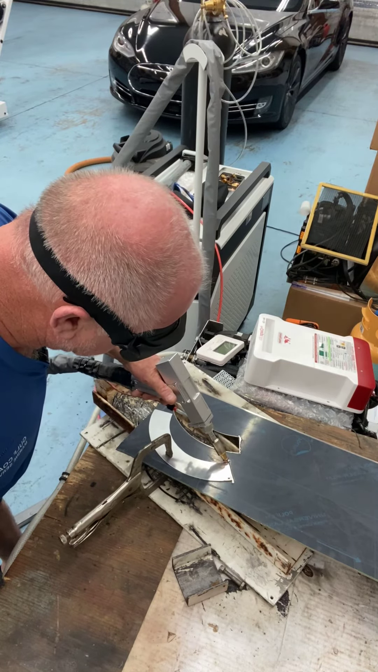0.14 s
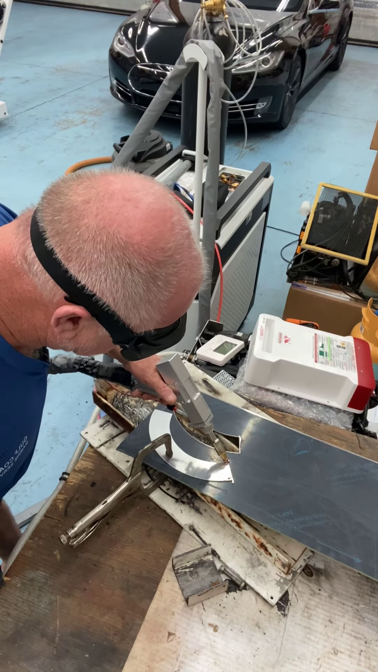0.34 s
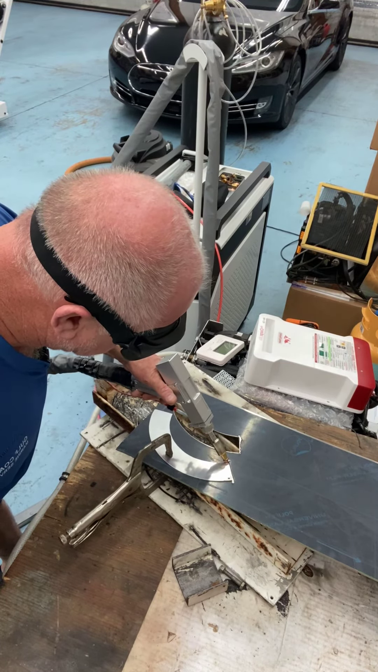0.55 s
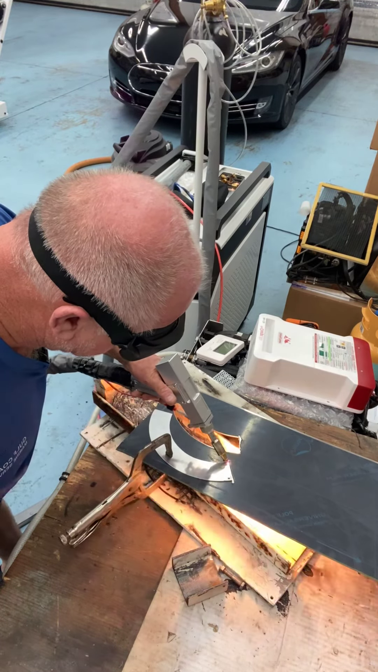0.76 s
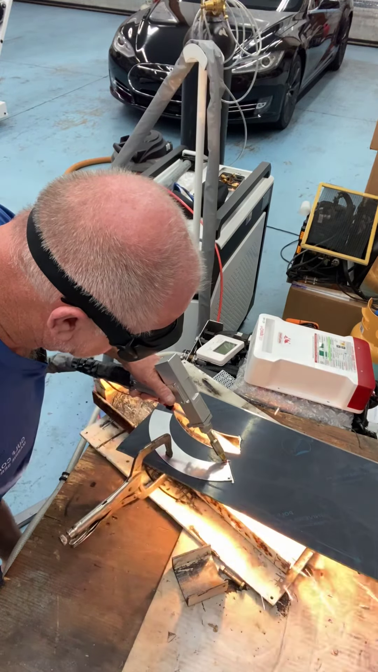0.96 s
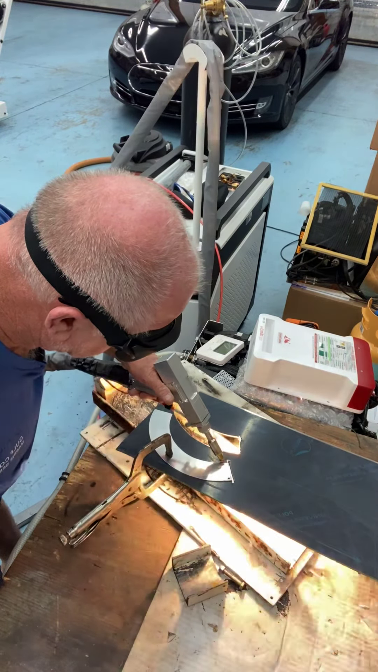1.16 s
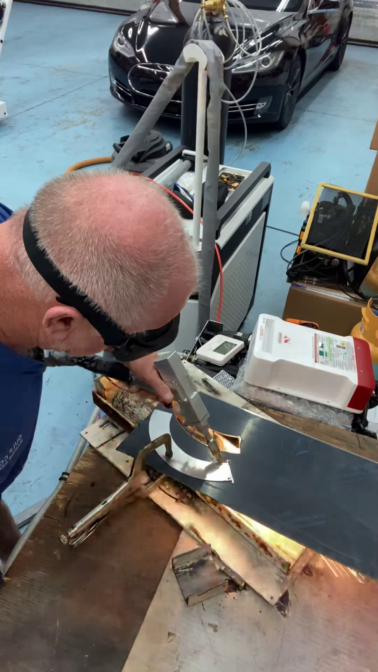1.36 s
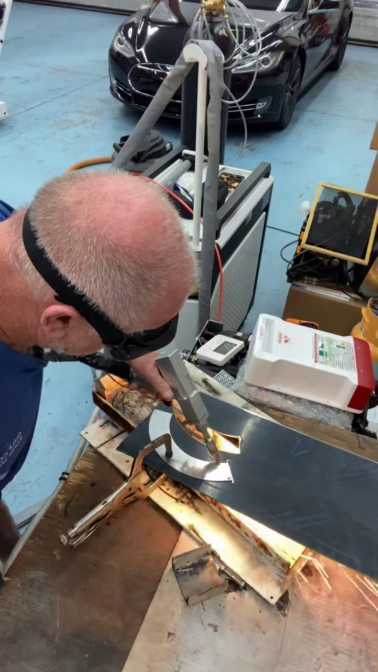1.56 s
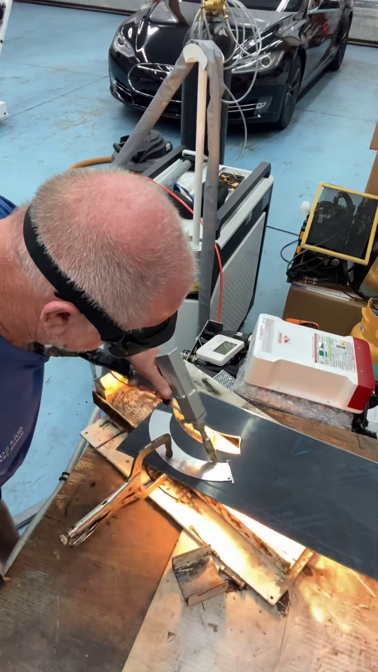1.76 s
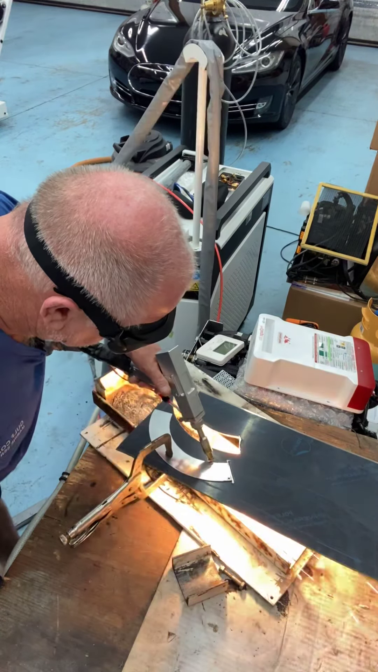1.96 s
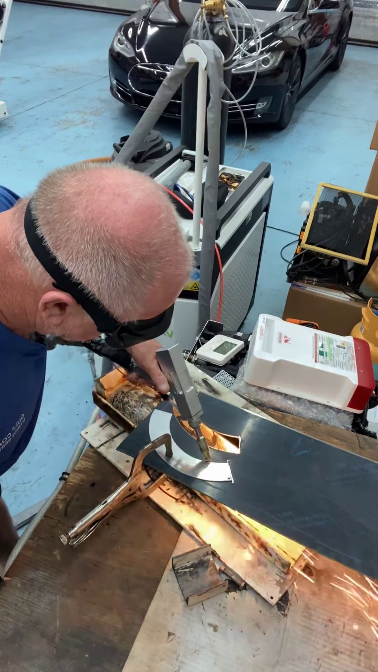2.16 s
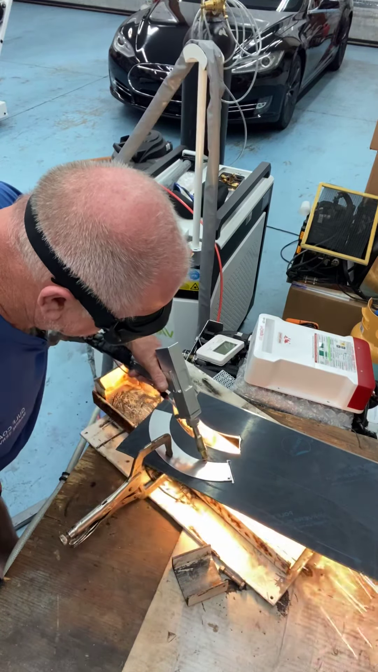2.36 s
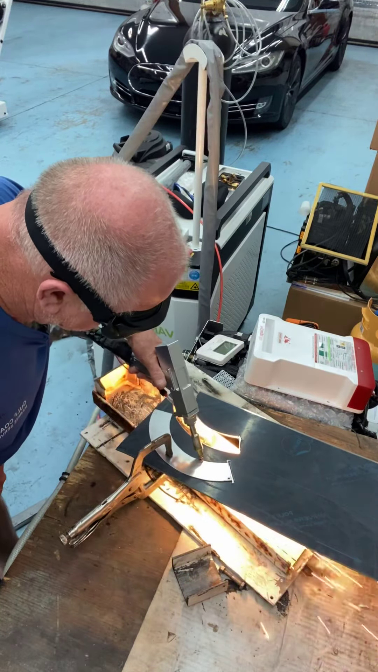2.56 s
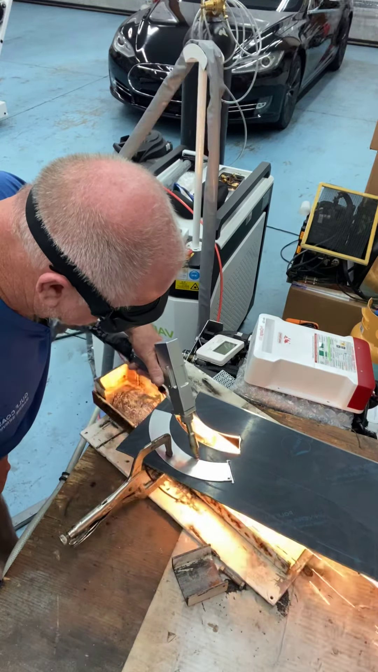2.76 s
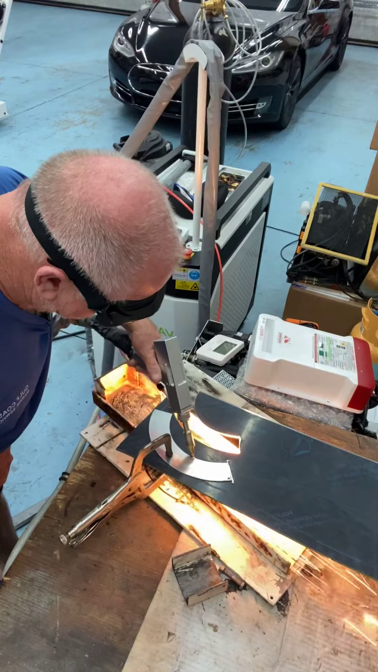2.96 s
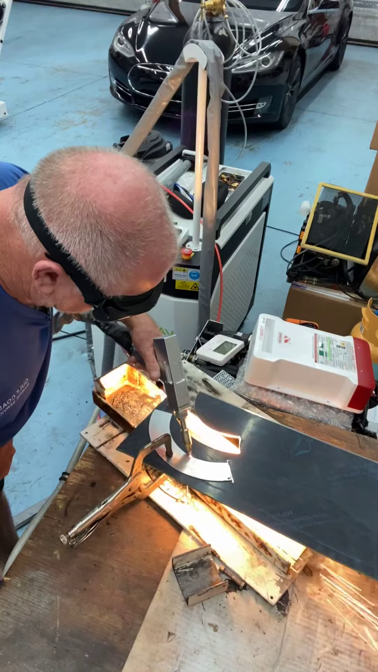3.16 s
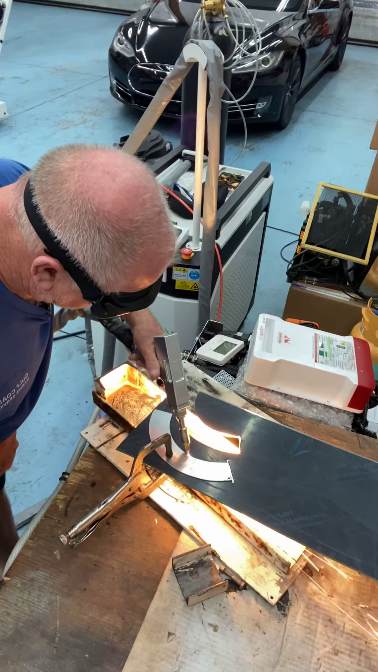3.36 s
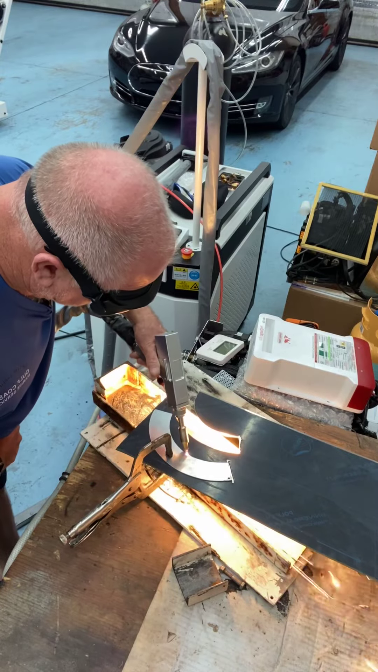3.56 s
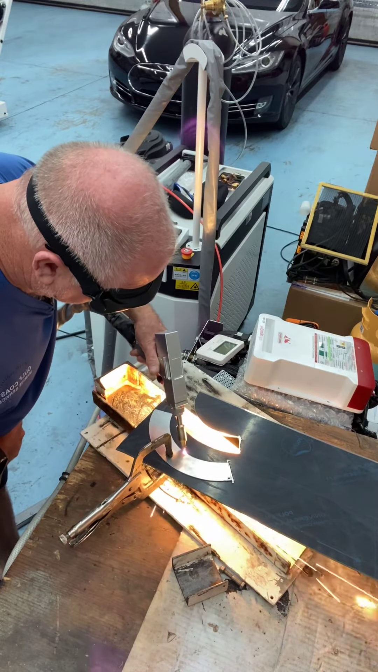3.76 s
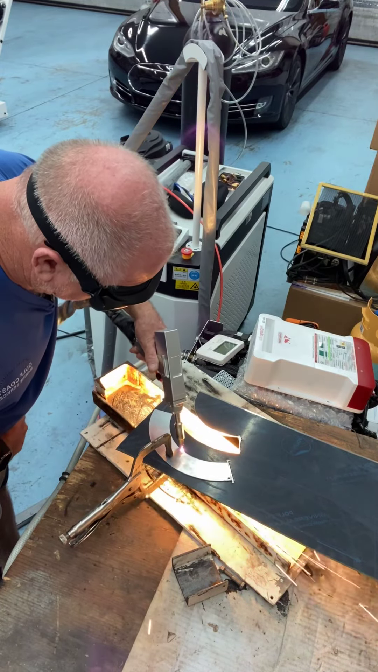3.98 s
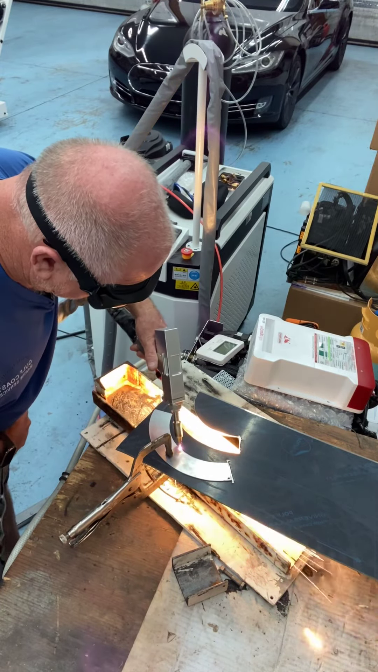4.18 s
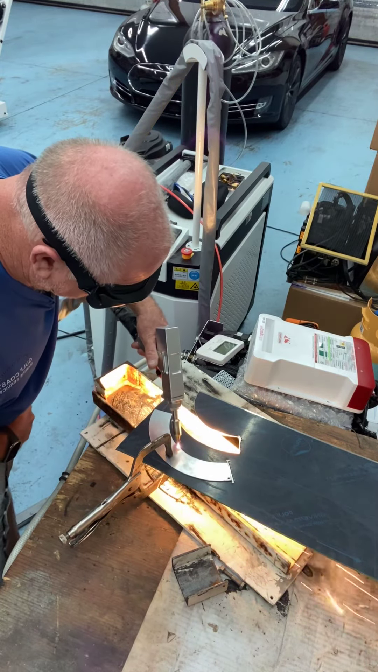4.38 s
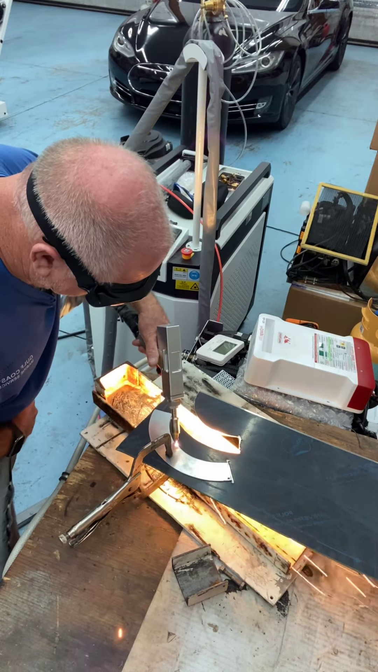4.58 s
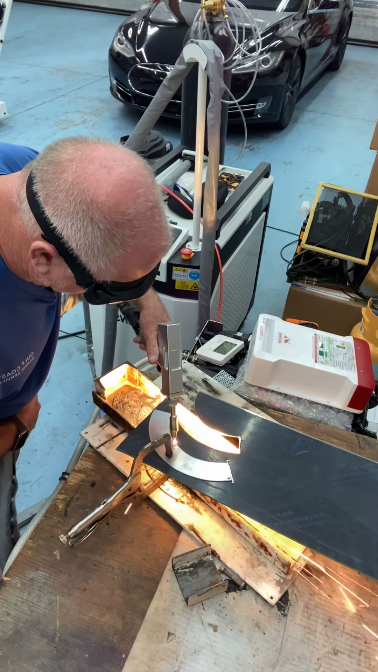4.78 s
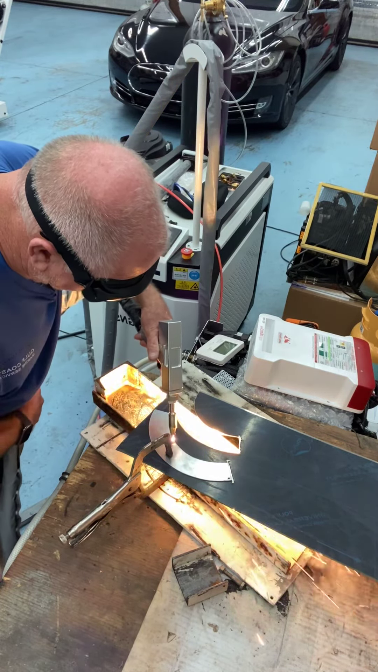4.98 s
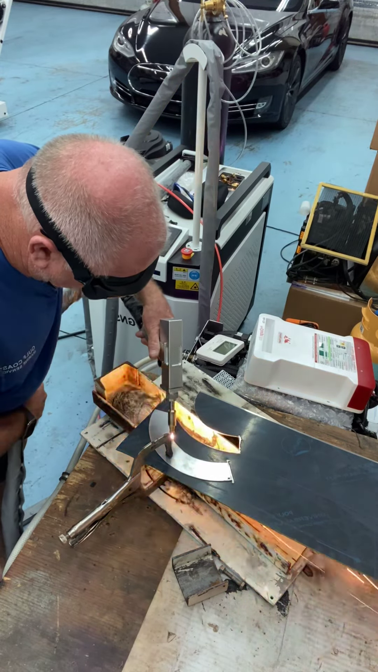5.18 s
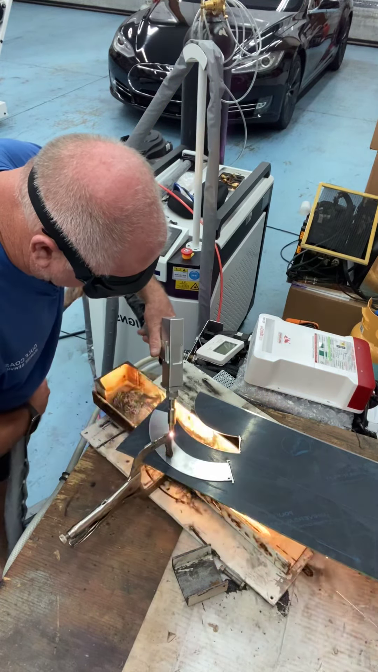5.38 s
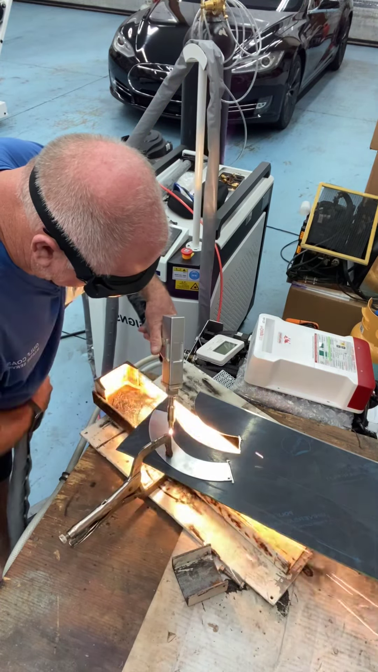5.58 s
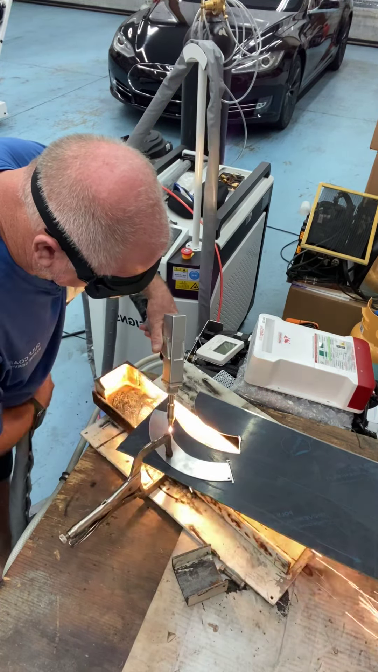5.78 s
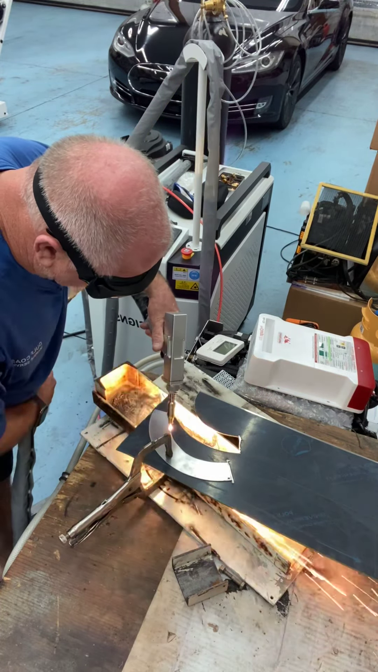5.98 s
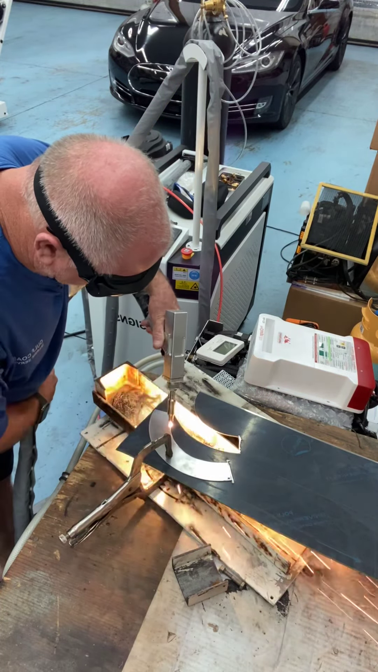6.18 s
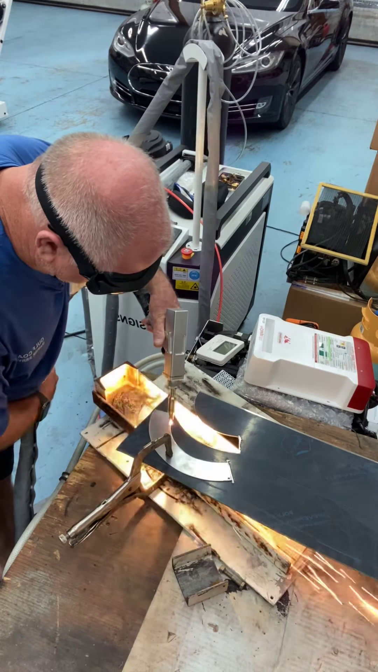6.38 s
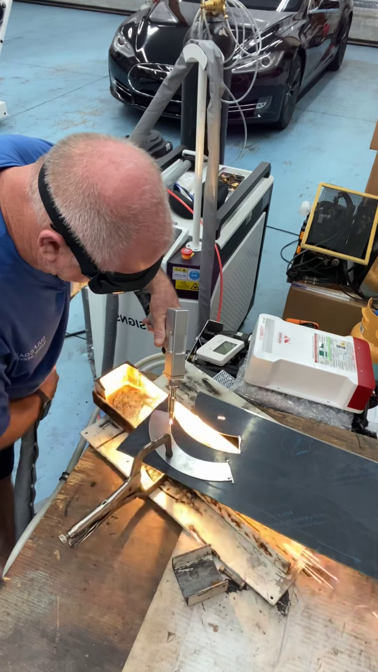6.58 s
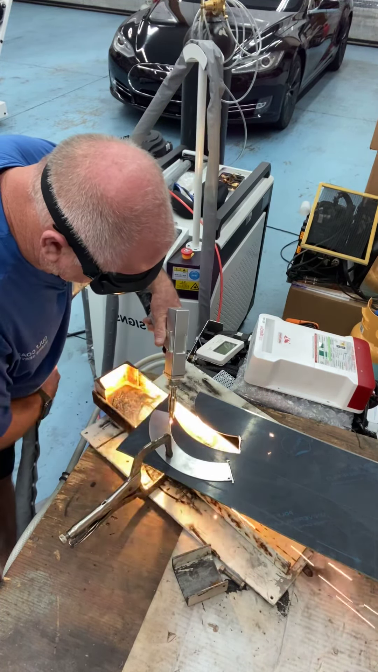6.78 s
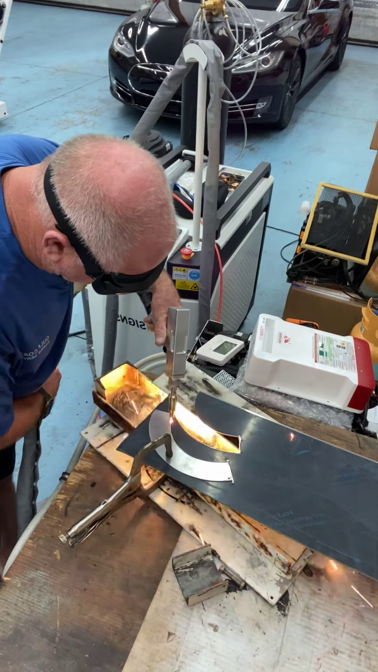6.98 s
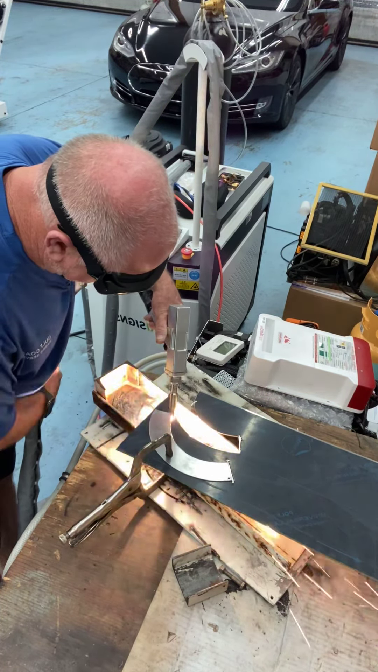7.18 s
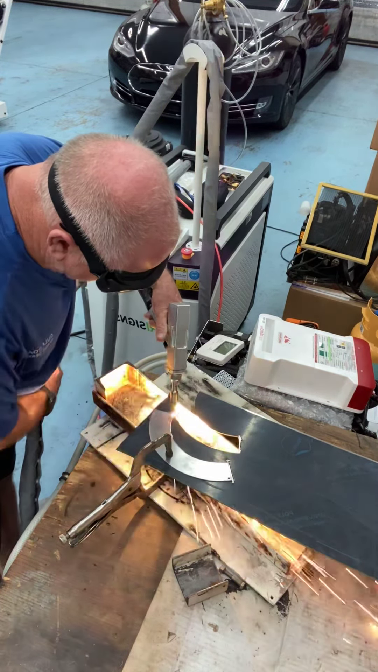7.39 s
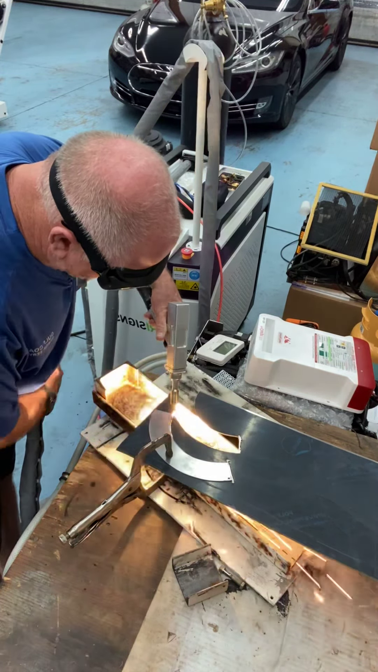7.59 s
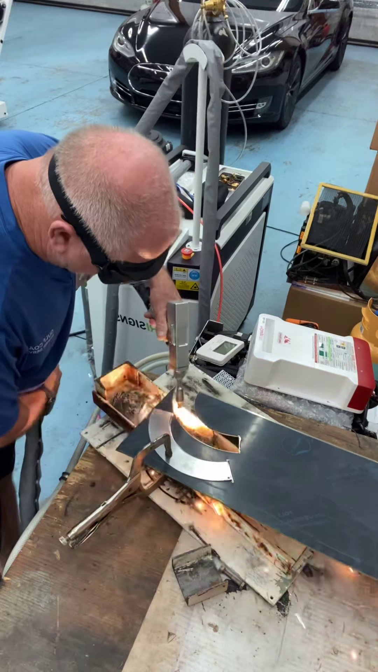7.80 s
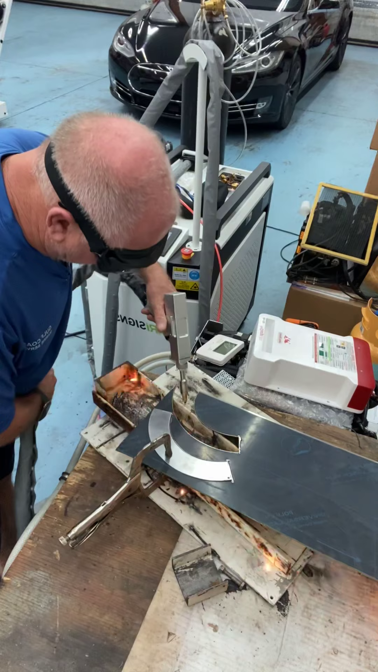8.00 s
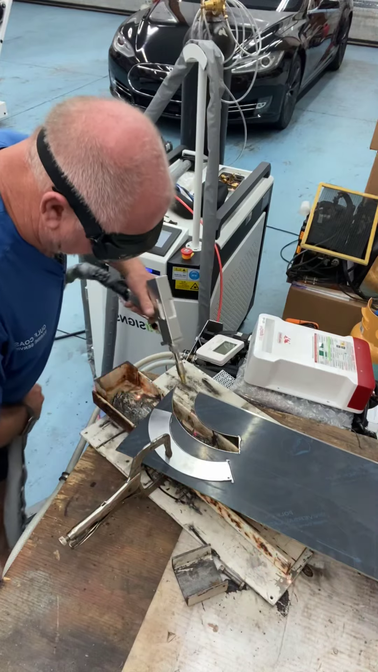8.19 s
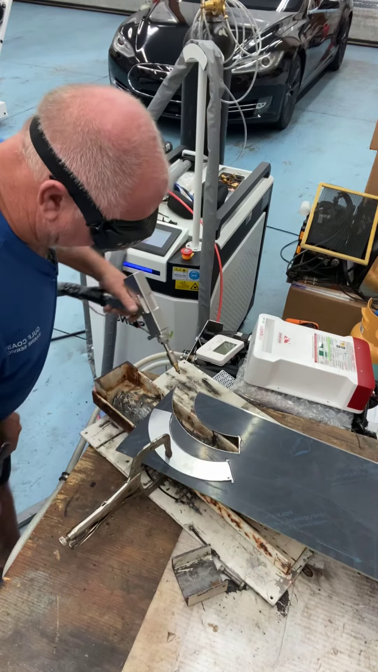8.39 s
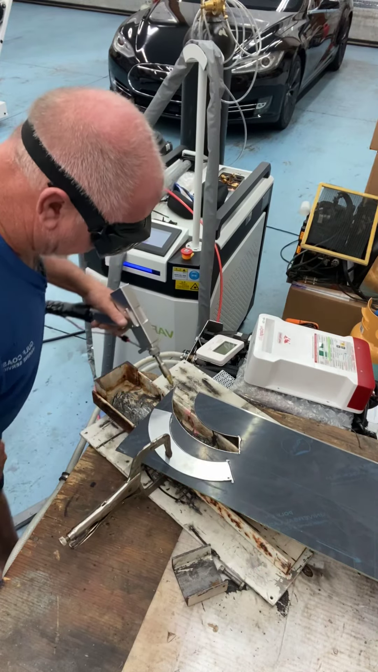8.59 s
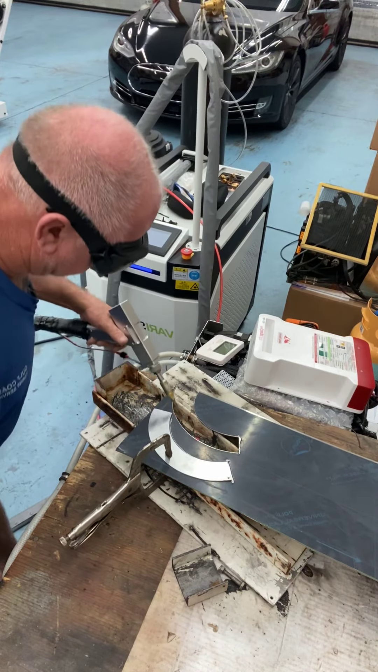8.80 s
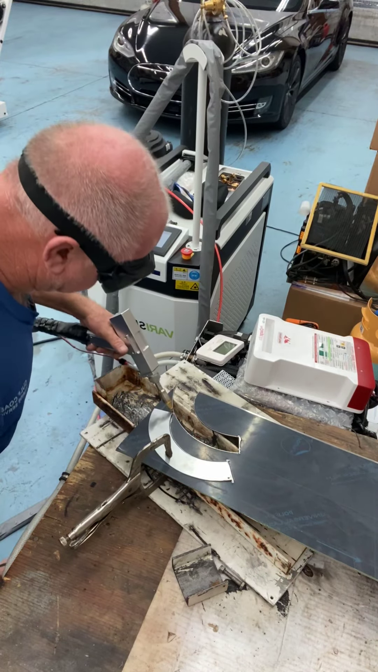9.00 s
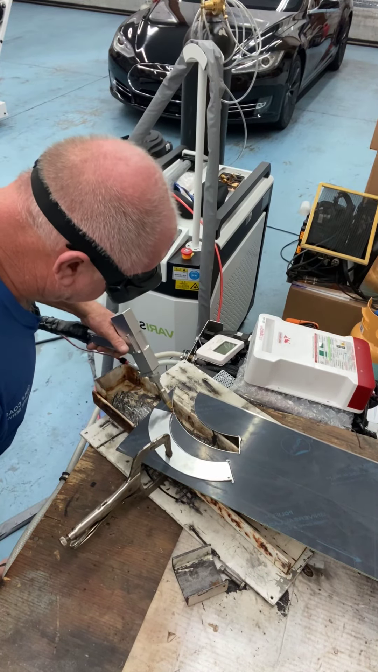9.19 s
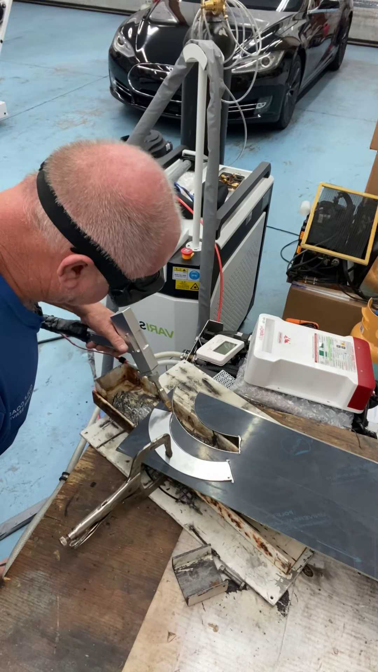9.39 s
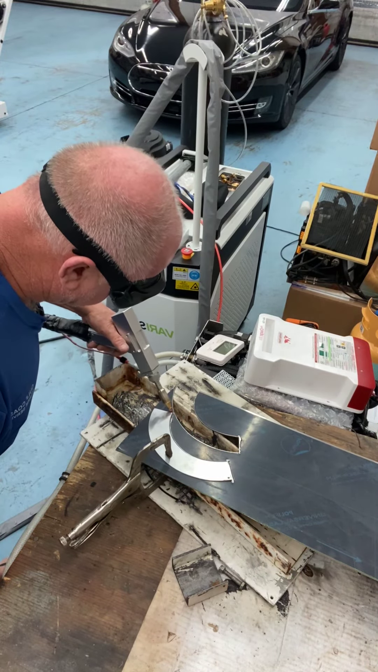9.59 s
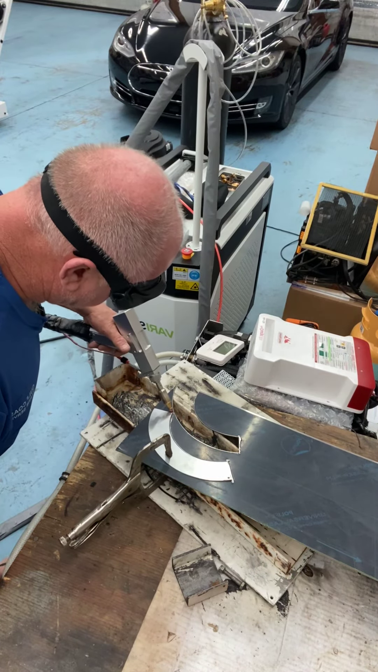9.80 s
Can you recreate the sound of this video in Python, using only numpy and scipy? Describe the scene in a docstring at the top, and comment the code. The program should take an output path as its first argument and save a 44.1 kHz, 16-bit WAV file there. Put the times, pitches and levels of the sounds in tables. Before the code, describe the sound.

A valve clicks, a harsh gas jet tears and sputters through metal, late squeals and pops, a final whoosh, then quiet workshop machine noise.

```python
"""Handheld laser cutter in a workshop

A valve clicks with a few decaying sines; jet noise hisses, rushes and sputters as gas tears through steel.
Gliding tones with overtones and noisy skirts squeal on the cut's edges; noise bursts spit, mostly late.
The torch lifts in a whoosh and the gas dies away. Filtered noise and faint sines make the machine, which
runs throughout; the hall adds a noise tail. Mono."""
import sys
import numpy as np
from scipy import signal
from scipy.fft import irfft
from scipy.io import wavfile
from scipy.ndimage import uniform_filter1d

SR = 44100
rng = np.random.default_rng(int(sys.argv[2]) if len(sys.argv) > 2 else 0)


def generate_wav(sig):
    """Save sig (samples, or channels by samples) to the path in sys.argv[1] as 16-bit PCM at SR."""
    pcm = np.round(np.clip(np.atleast_2d(sig).T, -1, 1) * 32767).astype(np.int16)
    wavfile.write(sys.argv[1], SR, pcm)


N = 434385
TIME = np.arange(N) / SR

# How the torch is held. Each row: time in seconds, pose number
# (0 slanted, 1 piercing, 2 upright, 3 at the sheet's edge, 4 lifted off).
TORCH_POSE = [(0, 0), (2.6, 0), (3.3, 1), (4.6, 1), (5.2, 2), (5.9, 2), (7.2, 3), (8.06, 3), (8.25, 4),
              (9.85, 4)]


def nozzle():
    """The jet hisses as broadband flow noise with a fine crackle of sparks; echoes off the sheet comb it."""
    # Each row: time in seconds, hiss level in dB.
    hiss_level = [(.94, -34), (1.2, -26), (1.5, -29.5), (1.8, -28.7), (2.25, -33.5), (3.0, -32), (3.3, -35),
                  (3.7, -33), (4.95, -33), (5.8, -33), (6.66, -31.5), (6.8, -26), (7.03, -28), (7.18, -30),
                  (7.35, -28), (8.06, -28.5), (8.16, -26.5)]
    # Each row: time in seconds, level of the hiss above 10 kHz in dB (0 leaves it as it is).
    treble_level = [(1.4, -2.5), (2.1, 2.5), (2.8, 4), (3.35, -1.5), (4.8, 1), (6.3, -0.5), (6.9, -2.5),
                    (7.3, 7.5), (7.55, 1.5), (8.1, 4.5)]
    hiss_db, = curves(hiss_level)
    treble_db, = curves(treble_level)
    pressure_db, gas_on = pressure()
    hiss = jet_colour(turbulence(rate_hz=1000, scatter_db=5.5, grain_db=-10.5))
    treble_taps = signal.firwin(41, 10000, pass_zero=False, fs=SR)
    treble = signal.oaconvolve(hiss, treble_taps, mode="same")
    hiss = hiss + (undb(treble_db) - 1) * treble
    hiss = mirror(hiss, lag_ms=.33, sway=.14, share=.15)
    hiss = mirror(hiss, lag_ms=1.1, sway=.1, share=.2)
    return hiss * undb(hiss_db + pressure_db + 0.5 * walk(50)) * gas_on


def jet_colour(x):
    """White x takes the colour of the jet, which depends on the torch's pose."""
    # Each row of the five: frequency in Hz, relative level in dB.
    slanted = [(1410, -38), (2400, -15.5), (2940, -12.5), (3280, -5), (3810, -2), (4190, -5.5),
               (5010, -1.5), (5600, -8), (6700, -5.5), (7960, 1.5), (9610, -4.5), (11400, -4), (12500, -9),
               (13600, -7.5), (15600, -13)]
    piercing = [(1530, -41), (2600, -17), (3020, -9), (3670, 0), (4670, 0.5), (5070, 1.5), (6950, -3.5),
                (7900, 4), (8640, -0.5), (9310, -2.5), (10600, -2), (13600, -5), (15600, -7)]
    upright = [(2700, -9.5), (3100, -12), (3800, -4.5), (4900, -1), (6200, 1), (7000, -2), (9200, 1),
               (10500, -3), (12100, -2), (13000, -8), (15100, -3.5), (15600, -10)]
    edge = [(1530, -43), (2600, -12), (3020, -13), (4170, -7), (4850, -0.5), (5470, 1), (6590, -0.5),
            (7160, -7), (7780, -3), (9310, 0.5), (10900, -11), (11800, -8.5), (13700, -13), (14800, -12.5),
            (15600, -7.5)]
    lifted = [(2600, -15), (3000, -10.5), (4000, -11), (5300, -9), (6700, -16), (9300, -18.5), (15600, -31)]
    return posed(x, [slanted, piercing, upright, edge, lifted], band_hz=(3500, 15500))


def mirror(x, lag_ms, sway, share):
    """An echo off the sheet; its path sways with the hand and sweeps a comb through the hiss."""
    lag = lag_ms * SR / 1000 * np.exp(sway * walk(1.3))
    samples = np.arange(N)
    echo = np.interp(samples - lag, samples, x)
    return (x + share * echo) / np.sqrt(1 + share ** 2)


def cut():
    """Gas tears through the molten slot: one stream of eddies makes rush, duller clog roar and low sputter."""
    # Free cut, one row per pose. Each row: rush level in dB, sputter level in dB.
    free_cut = [(-39, -58.5), (-38.5, -69), (-34.5, -55), (-36, -54), (-27.5, -68)]
    # Rush spectra by pose. Each row of the five: frequency in Hz, relative level in dB.
    slanted = [(280, -37), (480, -15), (560, -3), (672, -7.5), (834, -4.5), (948, 2), (1130, 1),
               (1910, -6.5), (2400, -21.5), (3120, -51), (5280, -120)]
    piercing = [(450, -8.5), (760, -7), (935, -7), (1110, 0), (1300, -4), (1590, -10.5), (1980, -13),
                (2390, -27.5), (2700, -30), (3510, -59), (5940, -120)]
    upright = [(420, -19), (560, -17.5), (830, -2.5), (1000, -2), (1180, 3.5), (1400, -2), (1750, -3),
               (2080, -6), (2350, -14.5), (2700, -25)]
    edge = [(280, -43.5), (480, -26.5), (684, -12.5), (730, -13), (856, 2.5), (1050, -2.5), (1130, 4.5),
            (1660, -4.5), (2140, -1.5), (2550, -10.5), (2700, -17.5), (3510, -48.5), (5940, -120)]
    lifted = [(400, -7.5), (730, -3), (880, 4.5), (1100, 5.5), (1420, -1.5), (1750, -6), (2050, -3.5),
              (2350, -9.5), (2700, -18)]
    # Sputter of the melt. Each row: frequency in Hz, relative level in dB.
    sputter_spectrum = [(25, -53.5), (60, -31.5), (120, -12.5), (200, -6), (300, -4), (430, 0), (550, -0.5),
                        (670, 0.5), (780, -7.5), (1500, -30)]
    flow_db_per_pressure_db = 0.68
    # the rush is weaker until the beam has pierced the sheet
    unpierced_db, pierced_s, piercing_s = -7.5, 1.09, 0.1
    lift_sputter_db = -39  # against the whoosh

    pose, = curves(TORCH_POSE)
    pressure_db, gas_on = pressure()
    rush_db, sputter_db = (np.interp(pose, np.arange(len(db)), db) for db in np.transpose(free_cut))
    free_rush = undb(rush_db + flow_db_per_pressure_db * pressure_db)
    free_sputter = undb(sputter_db + flow_db_per_pressure_db * pressure_db)
    clog_rush_power, clog_sputter_power = clogs()
    whoosh = lift()

    eddies = turbulence(rate_hz=480, scatter_db=2.5, grain_db=-1.5)
    unit_eddies = eddies / eddies.std()
    rush = posed(eddies, [slanted, piercing, upright, edge, lifted], band_hz=(850, 2300))
    roar = colour(unit_eddies, piercing, band_hz=(850, 2300))
    sputter = colour(unit_eddies, sputter_spectrum, band_hz=(80, 350))

    unpierced = np.clip((pierced_s - TIME) / piercing_s, 0, 1)
    free = np.hypot(free_rush * undb(unpierced_db * unpierced), whoosh)
    roar_gain = np.sqrt(free ** 2 + clog_rush_power) - free
    rush = (rush * free + roar * roar_gain) * undb(0.84 * walk(18))
    whoosh_sputter = whoosh * undb(lift_sputter_db)
    sputter_gain = np.sqrt(free_sputter ** 2 + clog_sputter_power + whoosh_sputter ** 2)
    sputter = sputter * sputter_gain * undb(0.72 * walk(16))
    return (rush + sputter) * undb(1.3 * walk(60)) * gas_on


def clogs():
    """Melt clogs the slot and gas blows back: rush and sputter power; rush gains on sputter as the slot heats."""
    # Each row: start in seconds, length in seconds, attack in seconds, sputter level in dB.
    clog_rows = [(0.781, .03, 0.0056, -54.5), (0.886, .165, 0.0089, -45.5), (1.837, 0.19, 0.04, -54),
                 (2.4, 0.15, .05, -54), (2.836, 0.29, 0.14, -46.5), (3.039, 1.92, 0.01, -38),
                 (4.98, 0.03, 0.022, -45), (5.13, .04, .02, -48.5), (5.598, .39, .02, -49),
                 (6.343, 0.012, 0.019, -43), (6.51, 0.014, .015, -46), (6.694, 0.14, .04, -50),
                 (7.21, 0.1, .06, -51), (7.637, .14, 0.054, -55), (7.704, .02, .005, -46.5)]
    release_s, sag_db_per_s = 0.047, 2
    rush_db, heat_db, heat_s = 2, 11, 0.41  # rush above sputter at the start, its growth, time constant
    rush, sputter = np.zeros(N), np.zeros(N)
    for s, length_s, attack_s, db in clog_rows:
        at = np.flatnonzero((TIME > s) & (TIME < s + length_s + 10 * release_s))
        age_s = TIME[at] - s
        attack = np.minimum(age_s / attack_s, 1)
        envelope = attack * np.exp(-np.maximum(age_s - length_s, 0) / release_s)
        gain = envelope * undb(db - sag_db_per_s * age_s)
        heating = 1 - np.exp(-age_s / heat_s)
        sputter[at] += gain ** 2
        rush[at] += (gain * undb(rush_db + heat_db * heating)) ** 2
    return rush, sputter


def lift():
    """Gain of the whoosh as the torch lifts: a swell and a fall, the jet flapping on the sheet's edge."""
    peak_s, peak_db, rise_db_per_s, fall_db_per_s = 8.258, -18, 132, 152
    flap_hz, flap_depth = 44.4, .3
    db = peak_db - np.maximum(rise_db_per_s * (peak_s - TIME), fall_db_per_s * (TIME - peak_s))
    flap_phase = 2 * np.pi * np.cumsum(flap_hz * (1 + 0.074 * walk(30))) / SR
    return undb(db) * (1 + flap_depth * np.sin(flap_phase))


def pressure():
    """Gas pressure in dB below full, building once the valve opens and bleeding away; whether gas flows."""
    opens_s, full_s, shuts_s = .56, 0.81, 8.162
    build_db_per_s, bleed_db_per_s = 87, 94
    build_db = -build_db_per_s * np.maximum(full_s - TIME, 0)
    bleed_db = -bleed_db_per_s * np.maximum(TIME - shuts_s, 0)
    return build_db + bleed_db, TIME > opens_s


def posed(x, spectra, band_hz):
    """The colour of x glides from one pose of the torch to the next."""
    pose, = curves(TORCH_POSE)
    out = np.zeros(N)
    for k, spectrum in enumerate(spectra):
        weight = 1 - np.abs(pose - k)
        at = np.flatnonzero(weight > 0)
        out[at] += weight[at] * colour(x[at], spectrum, band_hz)
    return out / x.std()


def turbulence(rate_hz, scatter_db, grain_db):
    """Smooth flow noise with sudden pressure drops of uneven size in it."""
    drops = rng.random(N) * SR / rate_hz
    at = np.flatnonzero(drops < 1)
    grains = np.zeros(N)
    grains[at] = undb(scatter_db * np.minimum(-np.log(drops[at]), 3))
    unit_grains = (grains - grains.mean()) / grains.std()
    return rng.standard_normal(N) - undb(grain_db) * unit_grains


def squeals():
    """The jet whistles on the cut's edge: pitch slides with the gap and shakes with the flow, in noisy skirts."""
    # Each row: start in seconds, length in seconds, start pitch in Hz, end pitch in Hz, level in dB,
    # roughness as share of pitch.
    squeal_rows = [ (1.245, 0.2, 1658, 1203, -39, 0.027), (3.455, 0.058, 6330, 4800, -34, .1),
                   (3.577, 0.022, 8640, 8300, -28, 0.022), (5.88, 0.022, 10100, 9600, -29, 0.046),
                   (5.901, 0.023, 8550, 6960, -23, 0.08), (6.342, .04, 13000, 9400, -32, 0.028),
                   (6.41, 0.02, 8800, 7300, -28, 0.071), (6.424, 0.034, 6230, 4800, -19.5, .035),
                   (6.458, .023, 6500, 8450, -20, .08), (6.46, 0.026, 3450, 5400, -27, 0.062),
                   (6.531, 0.043, 5900, 8800, -22.5, 0.033), (6.559, 0.027, 8600, 5880, -22, 0.039),
                   (6.594, .028, 6430, 7830, -29, 0.034), (6.631, 0.036, 12000, 7900, -29, .04),
                   (6.82, .07, 3600, 3900, -32.5, .07), (6.9, .1, 5000, 4560, -34, .06),
                   (7.005, .03, 4550, 4580, -29.5, .01), (7.282, 0.047, 1306, 910, -29.5, 0.1),
                   (7.54, .05, 3100, 3874, -32, 0.075), (7.547, .022, 5000, 6200, -23, .07),
                   (7.588, .026, 4130, 4700, -27, .04), (7.599, .05, 5600, 4640, -27, .06),
                   (8.13, 0.14, 2430, 1940, -31.5, 0.074), (8.22, .11, 1400, 837, -33.5, 0.13)]
    # One long howl sinks as the gap widens. Each row: time in seconds, pitch in Hz, level in dB,
    # roughness as share of pitch.
    howl = [(6.7, 8500, -28, .025), (6.735, 5700, -26, .025), (6.755, 4800, -16.5, .025),
            (6.785, 3550, -27.5, .02), (6.8, 2600, -51, .12), (6.839, 2055, -29.5, .1),
            (6.881, 1740, -29, 0.044), (7.069, 1550, -32, .028), (7.09, 1300, -35.5, .1),
            (7.172, 1130, -34.5, .1)]
    howl_fade_s = .008
    skirt_db, skirt_rough = -10, .13  # level against the core, roughness as share of pitch
    out, flutter = np.zeros(N), undb(2.0 * walk(250))
    shake = .9 * walk(2200) + .55 * walk(260)
    skirt_shake = walk(3000)

    def whistle(at, hz, rough):
        """A core tone and a quieter copy of it with the skirt's roughness."""
        core = edge_tone(hz * (1 + rough * shake[at]))
        skirt = edge_tone(hz * (1 + skirt_rough * skirt_shake[at]))
        return (core + undb(skirt_db) * skirt) / np.hypot(1, undb(skirt_db))

    for s, length_s, start_hz, end_hz, db, rough in squeal_rows:
        at, u, envelope = swell(s, length_s)
        hz = start_hz * (end_hz / start_hz) ** u
        out[at] += undb(db) * envelope * whistle(at, hz, rough)

    hz, db, rough = curves(howl)
    to_end_s = np.minimum(TIME - howl[0][0], howl[-1][0] - TIME)
    fade = np.minimum(to_end_s / howl_fade_s, 1)
    at = np.flatnonzero(fade > 0)
    out[at] += undb(db[at]) * fade[at] * whistle(at, hz[at], rough[at])
    return out * flutter


def edge_tone(hz, count=5):
    """A fundamental of rms 1 plus overtones that weaken with number and carry best in favoured bands."""
    # Each row: frequency in Hz, overtone level in dB.
    overtone_colour = [(2400, -17.5), (3200, -11.5), (4600, 2.5), (6500, -8.5), (8200, 3), (9500, -2.5),
                       (11500, -19.5), (15600, -23)]
    slope_db_per_octave = -4.5
    phase = 2 * np.pi * np.cumsum(hz) / SR
    tone = np.sin(phase)
    for k in range(2, count + 1):
        db = slope_db_per_octave * np.log2(k) + np.interp(k * hz, *np.transpose(overtone_colour))
        tone = tone + undb(db) * np.sin(k * phase) * (k * hz < SR / 2)
    return np.sqrt(2) * tone


def spits():
    """Brief spurts from the nozzle or the melt: noise bursts, a low thud and a sizzle in the jet's colour."""
    # Each row: start in seconds, length in seconds, thud level in dB, sizzle level in dB.
    spit_rows = [ (.561, .006, -55, -55), (0.579, 0.007, -45, -64), (0.803, .08, -58, -27.5),
                 (1.014, 0.043, -41, -28.5), (4.024, 0.014, -22, -50), (7.546, 0.044, -33, -25),
                 (7.637, 0.044, -33, -25), (7.705, .013, -17, -34.5), (7.719, 0.013, -12.5, -14.5),
                 (7.733, 0.0091, -29.5, -16), (7.751, 0.027, -31.5, -22.5), (7.778, 0.02, -42, -21.5),
                 (7.797, 0.0062, -23, -24), (7.804, 0.0024, -15.5, -17), (7.8085, 0.0018, -21, -13),
                 (7.819, 0.047, -38, -23)]
    # Each row: frequency in Hz, relative level in dB.
    thud_spectrum = [(45, -30), (120, -20), (280, -12), (450, -6.5), (800, -2), (1140, 1), (1600, -9),
                     (2150, -6), (2600, -17)]
    thud, sizzle = np.zeros(N), np.zeros(N)
    for s, length_s, thud_db, sizzle_db in spit_rows:
        at, _, envelope = swell(s, length_s)
        thud[at] += undb(thud_db) * envelope
        sizzle[at] += undb(sizzle_db) * envelope
    thuds = colour(thud * rng.standard_normal(N), thud_spectrum)
    return thuds + sizzle * jet_colour(rng.standard_normal(N))


def valve():
    """One small click as the gas is switched on: a sum of short decaying sines."""
    # Each row: frequency in Hz, peak level in dB, 60 dB decay time in seconds.
    ring_modes = [(1950, -46, .018), (3250, -45, 0.018), (3950, -42, .012), (4500, -48, .01),
                  (7500, -51, .008), (11000, -56, .007)]
    click_s = .526
    t = np.arange(SR // 10) / SR
    ring = np.zeros(len(t))
    for hz, db, t60_s in ring_modes:
        decay = np.exp(-np.log(1000) * t / t60_s)
        ring += undb(db) * decay * np.sin(2 * np.pi * hz * t)
    start = int(click_s * SR)
    return np.pad(ring, (start, N - start - len(t)))


def machine():
    """Cooling fans as noise, with a faint chiller hum and a thin whine, stronger after the cut, as sines."""
    # Each row: time in seconds, fan level in dB against fan_base_db, whine level in dB.
    machine_levels = [(0, -1.5, -68), (.6, 0, -69), (8.3, -3, -64), (8.8, 3, -57), (9.3, -0.5, -56.5),
                      (9.85, -0.5, -57)]
    # Fan noise in the hall. Each row: frequency in Hz, relative level in dB.
    fan_spectrum = [(25, -25.5), (50, -10.5), (95, -1.5), (150, -5), (220, 0.5), (310, -1.5), (430, -1),
                    (600, -7), (1200, -8.5), (2200, -15.5), (4000, -22.5), (8000, -33.5), (15000, -43)]
    # Chiller lines. Each row: frequency in Hz, level in dB.
    hum_lines = [(100, -76.5), (226, -69.5), (1235, -81.5), (1669, -78)]
    fan_base_db, whine_hz = -56.5, 830
    fan_db, whine_db = curves(machine_levels)
    fan_gain = undb(fan_base_db + fan_db + 0.39 * walk(9.3))
    fans = colour(rng.standard_normal(N), fan_spectrum) * fan_gain
    # phase of 1 Hz; whine and hum share its slight pitch drift
    phase = 2 * np.pi * np.cumsum(1 + .0006 * walk(3.3)) / SR
    whine = undb(whine_db + .7 * walk(8.8)) * np.sin(whine_hz * phase)
    hum = undb(2.56 * walk(14.0)) * sum(undb(db) * np.sin(hz * phase) for hz, db in hum_lines)
    return fans + np.sqrt(2) * (whine + hum)


def workshop(x, t60_low_s, t60_high_s, wet_db):
    """The hall answers with a diffuse tail in which the treble dies first."""
    t = np.arange(SR) / SR
    noise = rng.standard_normal(SR) * (t > .006)
    low = signal.sosfilt(signal.butter(2, 3000, fs=SR, output="sos"), noise)
    high = signal.sosfilt(signal.butter(2, 3000, "high", fs=SR, output="sos"), noise)
    low_tail = low * np.exp(-np.log(1000) * t / t60_low_s)
    high_tail = high * np.exp(-np.log(1000) * t / t60_high_s)
    tail = low_tail - high_tail
    return x + undb(wet_db) * signal.oaconvolve(x, tail / np.linalg.norm(tail))[:N]


def undb(db):
    """Decibels to gain."""
    return 10 ** (np.asarray(db) / 20)


def curves(rows):
    """Each column after the first (time in seconds) as a signal in time."""
    s, *columns = np.transpose(rows)
    return [np.interp(TIME, s, c) for c in columns]


def walk(rate_hz):
    """Smooth chance with spread 1 that changes about `rate_hz` times a second."""
    k = max(int(SR / rate_hz), 1)
    steps = np.repeat(rng.standard_normal(N // k + 1), k)
    x = uniform_filter1d(steps, k)[:N]
    return x / x.std()


def colour(x, points, band_hz=(20, 20000)):
    """Shape x by a spectrum with steep skirts; unit white noise comes out with rms 1 within the band."""
    f = np.maximum(np.arange(1025) * SR / 2048, 1)
    hz, db = np.transpose(points)
    octaves_outside = np.abs(np.log2(f / np.clip(f, hz[0], hz[-1])))
    gain = undb(np.interp(np.log(f), np.log(hz), db) - 60 * octaves_outside)
    gain /= np.sqrt(np.mean(gain ** 2 * (f > band_hz[0]) * (f < band_hz[1])))
    taps = np.roll(irfft(gain), 1024) * np.hanning(2048)
    return signal.oaconvolve(x, taps, mode="same")


def swell(s, length_s):
    """The samples that a short event covers, its progress 0-1 and its rounded envelope."""
    u = np.linspace(0, 1, max(int(length_s * SR), 8))
    return int(s * SR) + np.arange(len(u)), u, np.sqrt(np.abs(np.sin(np.pi * u)))


def scene():
    """The torch in the hall over the machine, the same in both ears."""
    torch = nozzle() + cut() + squeals() + spits() + valve()
    mono = workshop(torch, t60_low_s=0.74, t60_high_s=0.44, wet_db=-13.5) + machine()
    return np.array([mono, mono])


def record(dry):
    """Cuts the lowest bass, rounds the loudest peaks and cuts the top steeply."""
    x = signal.sosfilt(signal.butter(2, 38, "high", fs=SR, output="sos"), dry)
    x = .9 * np.tanh(x / .9)
    top_hz = 15680
    return signal.sosfilt(signal.ellip(12, .1, 80, top_hz, fs=SR, output="sos"), x)


dry = scene()
out = record(dry)
generate_wav(out)
```